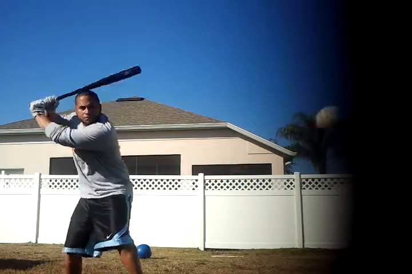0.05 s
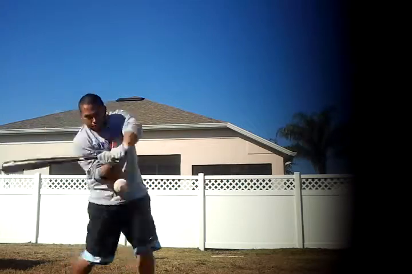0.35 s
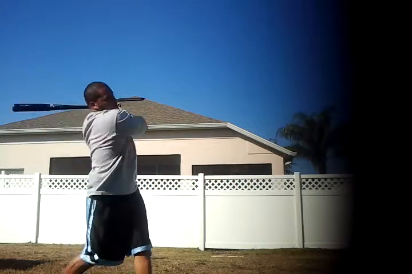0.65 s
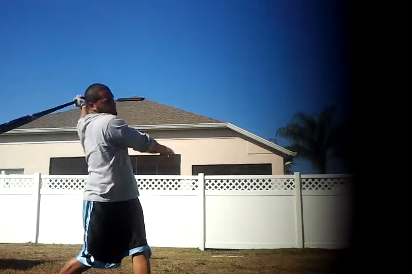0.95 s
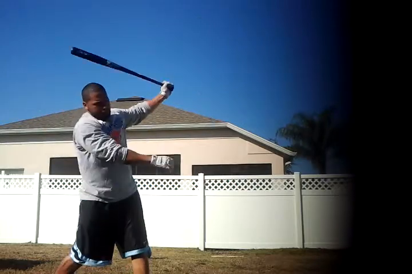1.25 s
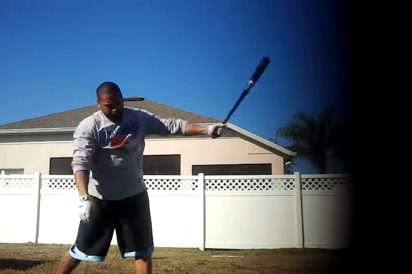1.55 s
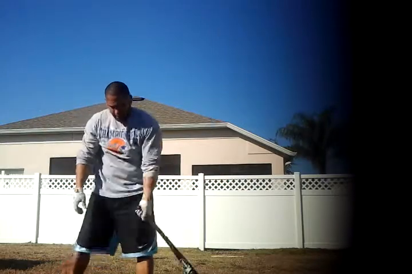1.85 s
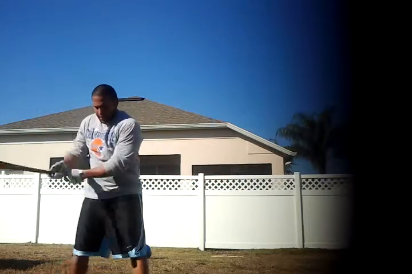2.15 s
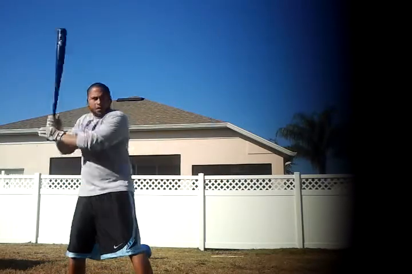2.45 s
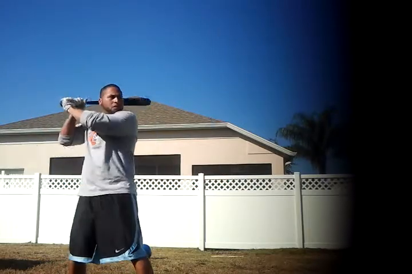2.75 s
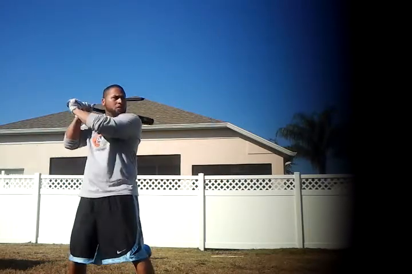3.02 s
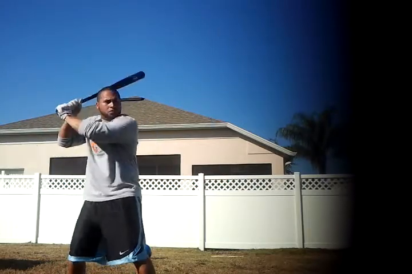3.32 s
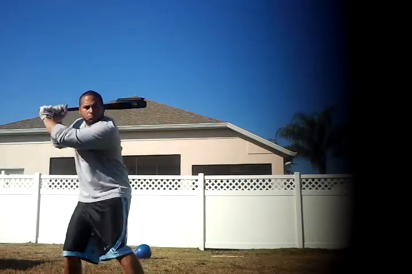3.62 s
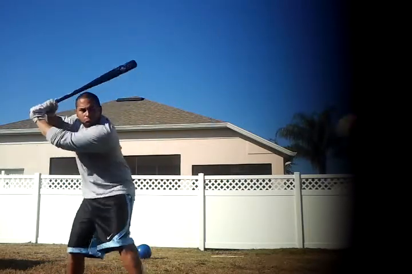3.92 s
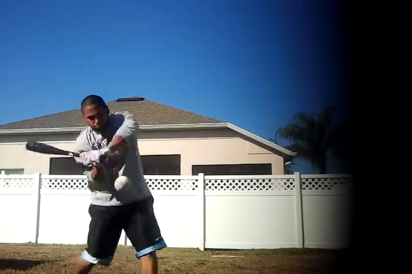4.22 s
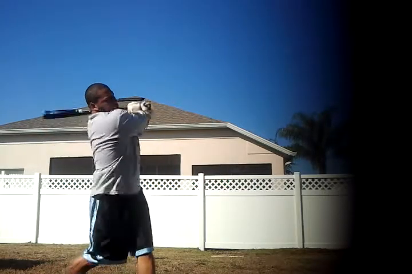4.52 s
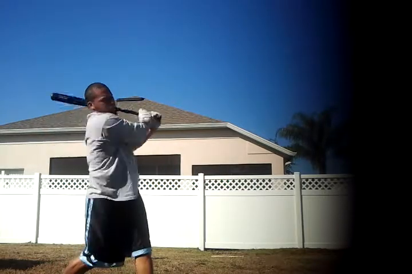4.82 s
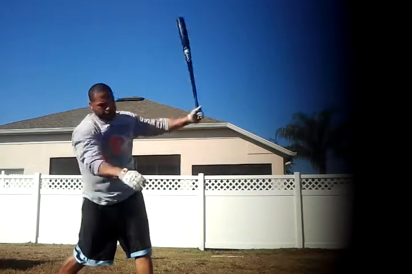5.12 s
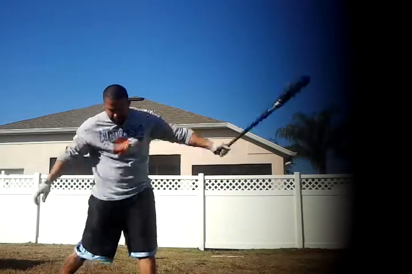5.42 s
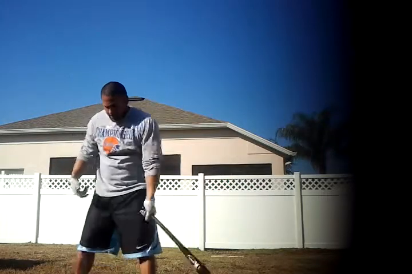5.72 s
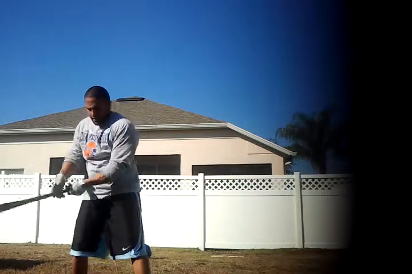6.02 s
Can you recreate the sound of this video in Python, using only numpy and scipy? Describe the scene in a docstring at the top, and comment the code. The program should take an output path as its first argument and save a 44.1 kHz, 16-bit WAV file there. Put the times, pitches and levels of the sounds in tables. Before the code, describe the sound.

A faint, steady outdoor hiss runs throughout, in a back yard. A few small, dry ticks come close by, then at about 0.5 seconds a bat swishes briefly and cracks hard against a ball, echoing quickly off the house and fence. At once the ball hits a practice net, which rattles while its steel frame clanks and jingles brightly. Between 1.1 and 1.6 seconds the ball drops and rustles through dry grass with soft knocks; faint clinks linger until about 2.6 seconds. More small ticks come from 3.8 seconds. At 4.4 seconds there is a second swish and crack, and the frame clatters and rings until about 5.2 seconds, with a tiny metal squeak. The ball lands in the grass with a dull knock around 5.1 seconds, and light clinks fade by 6 seconds. The loudest blows overload the small, narrow-band microphone.

```python
"""A swish and the hard crack of a bat, twice, thrown back by the house and fence of a back yard. Each ball
flies into a practice net whose steel frame clanks, jingles and rings on, then drops and rustles through dry
grass. Small ticks close by and a faint outdoor hiss fill the pauses. A small, narrow-band microphone picks it
up; the loudest blows are held down and their peaks clip flat."""
import sys
import numpy as np
from scipy import signal
from scipy.fft import rfft, irfft, next_fast_len
from scipy.io import wavfile
from scipy.ndimage import uniform_filter1d, minimum_filter1d

SR = 44100
rng = np.random.default_rng(int(sys.argv[2]) if len(sys.argv) > 2 else 0)


def wav_record(signal):
    """Record a signal, one row per channel, as 16-bit PCM in the file named by sys.argv[1]."""
    frames = np.transpose(np.atleast_2d(signal))
    bounded = np.clip(frames, -1, 1)
    # unit amplitude maps onto the largest positive 16-bit level
    quanta = np.round(bounded * 32767).astype(np.int16)
    wavfile.write(sys.argv[1], SR, quanta)


N = 276066
TIME = np.arange(N) / SR
MIC_ROLLOFF_HZ, MIC_CUTOFF_HZ = 6790, 8742

# The swings. Each row: moment of contact in seconds, crack level in dB, its t60 (time to fall 60 dB) in
# seconds, swish level in dB, then the net's rattle at the catch: level in dB, t60 in seconds.
SWINGS = [(0.549, 3.3, 0.058, -43, -13, 0.51), (4.4320, 3, 0.049, -41.5, -17, 0.45)]
# Tone of the crack. Each row: frequency in Hz, level in dB.
CRACK_SPECTRUM = [(60, -30), (150, -43.5), (300, -25), (500, -19), (760, 0), (1020, 0.5), (1500, 1.5),
                  (1900, -1), (2400, 3), (3300, -5.5), (5000, -6.5), (7000, -13.5), (8000, -48),
                  (9000, -55)]
# House and fence, heard from the microphone. Each row: echo delay in seconds, level in dB.
WALL_ECHOES = [(0.0315, -22), (0.0379, -6), (.051, -18), (.074, -13)]

def bat():
    """The barrel swishes up to the ball and cracks; house and fence answer."""
    cracks, swish_gain = np.zeros(N), np.zeros(N)
    for s, db, t60, swish_db, *_ in SWINGS:
        add(cracks, s, from_db(db) * colour(rng.standard_normal(SR), CRACK_SPECTRUM) * fade(t60))
        swish_gain += from_db(swish_db - 180 * np.abs(TIME - s)) * (TIME < s + .02)
    cracks = mic_band(cracks, low_hz=230)
    swish_spectrum = [(100, -15.5), (700, -1.5), (1800, -2.5), (7000, -9), (8500, -34.5)]
    out = cracks + swish_gain * colour(rng.standard_normal(N), swish_spectrum)
    thin = highpass(cracks, 900, order=1)   # light fence panels let the bass through
    for delay, db in WALL_ECHOES:
        add(out, delay, from_db(db) * thin)
    return out


# Blows on the net's steel frame. Each row: start in seconds, level in dB, centre of the clash in Hz,
# place from 0 (post) to 1 (rail), trim of the ring in dB.
FRAME_BLOWS = [(0.586, -4.5, 3600, 0.15, -23), (0.61, -0.5, 5760, 0.41, -5), (0.6505, 0.5, 6840, 0.7, -5),
               (0.684, -12.5, 5500, 0.38, 4), (0.7470, -10, 5100, 0, 3), (0.7878, -10, 5300, 0.99, -3),
               (0.9521, -23, 4830, 0.19, 1), (1.0633, -23, 5300, 0.67, 4.5), (1.2087, -25, 5180, 0.56, -6),
               (1.2820, -28.5, 4400, 0, -0.5), (1.593, -37.5, 4540, .9, 2), (1.793, -39, 2830, .75, 6),
               (2.063, -37, 3940, 0.79, 2), (2.614, -37, 4370, 0.45, 4.5), (4.4700, -3, 5070, 0.31, -24),
               (4.498, -9.5, 5500, .5, -13.5), (4.528, -15, 5500, 0.4, 7), (4.545, -5.5, 6140, 0.66, 0.5),
               (4.584, -16.5, 4900, 0.075, 9.5), (4.620, -6.5, 5300, 0, -3), (4.644, -9.5, 5900, 0.1, 5.5),
               (4.696, -16.5, 5460, 0.28, 3), (4.778, -8.5, 3900, 0.72, -5.5),
               (4.9438, -16.5, 6450, 1, 0.5), (5.064, -6.5, 5220, 1, -4), (5.089, -11.5, 5100, 0.91, -2),
               (5.1134, -19, 4300, 0.5, 7.5), (5.1748, -14.5, 4870, 1, 2), (5.349, -34, 4050, 0.8, 15.5),
               (5.647, -34.5, 4000, 0.6, 0), (6.068, -39.5, 3630, 1, 5.5)]
# The tubes' modes. Each row: pitch in Hz, level in dB struck at the post, level in dB struck at the rail,
# t60 in seconds before damping.
FRAME_MODES = [(1244, -17, -8, .25), (1470, -13, -13, .3), (2284, -12, -18, .2), (2440, -8, -14, .25),
               (3088, -17, -20, .9), (3165, -9, -17, .75), (3199, -11, -14, 1.), (3232, -9, -8, .65),
               (3322, -17, -11, .7), (3513, -14, 1, .42), (3865, -9, -14, .3), (3905, -14, -6, .22),
               (4140, -14, -12, .25), (4302, -7, -18, .3), (4347, -8, -17, .35), (4743, -7, 0, .28),
               (4855, -8, -10, .22), (4899, -12, 0, .25), (5310, -12, -3, .18), (5470, 1, -12, .24),
               (5500, -3, -14, .2), (5590, -2, -8, .2), (6080, -9, -6, .16), (6260, -2, -7, .17),
               (6540, -6, -8, .14), (6681, -13, -6, .15), (7149, -17, -8, .12)]
DAMP_FROM_HZ = 2900   # the netting shortens the ring above this pitch

def frame():
    """Each blow is a snap, a brief clash and two rebounds; where it lands decides which modes ring on."""
    ringing, clashes = np.zeros(N), np.zeros(N)
    hz, post_db, rail_db, t60 = np.transpose(FRAME_MODES)
    t60 = t60 * np.minimum(DAMP_FROM_HZ / hz, 1) ** .83
    ping = from_db(1) * fade(.14)   # all modes start loud, until the loose joints soak it up
    modes = np.array([np.sin(2 * np.pi * f * TIME[:SR]) * (fade(t) + ping) for f, t in zip(hz, t60)])
    for s, db, centre_hz, place, ring_db in FRAME_BLOWS:
        place_db = (1.5 - place) * post_db + place * rail_db
        focus_db = 3 - 2.5 * np.abs(np.log2(hz / centre_hz))   # modes near the clash ring best
        soft_db = .23 * db * np.maximum(np.log2(hz / DAMP_FROM_HZ), 0)   # softer blows ring duller
        strengths = from_db(place_db + focus_db + soft_db + rng.normal(0, 1, len(hz)))
        ring = (strengths * rng.choice([-1, 1], len(hz))) @ modes
        detune = 1 + .0015 * rng.normal()   # the joints shift from blow to blow
        ring = np.interp(TIME[:SR] * detune, TIME[:SR], ring)
        add(ringing, s, from_db(db + ring_db - 14) * ring)
        add(clashes, s, from_db(db - 8) * burst(centre_hz, octaves=.84, t60=.1, low_hz=700, size=8192))
        snap = burst(centre_hz, octaves=1, t60=.02, low_hz=900, size=2048)
        for touch in range(3):   # the loose joints chatter, 7 dB weaker each time
            delay = touch * .014 * rng.uniform(.61, 1.3)
            add(clashes, s + delay, from_db(db - 4.5 - 7 * touch) * snap)
    return clashes + mic_band(ringing, low_hz=840)


def shaken_modes(contacts, modes, t60_scale):
    """Small contacts all over the frame ring its modes; rms 1."""
    out = np.zeros(N)
    for hz, post_db, rail_db, t60 in modes:
        radius, angle = from_db(-60 / (t60_scale * t60 * SR)), 2 * np.pi * hz / SR
        feedback = [1, -2 * radius * np.cos(angle), radius ** 2]
        ring = signal.lfilter([np.sin(angle)], feedback, contacts + 1e-18)
        out += from_db((post_db + rail_db) / 2) * ring
    return rms_one(out)


# Tone of the rattling net. Each row: frequency in Hz, level in dB.
RATTLE_SPECTRUM = [(88, -62.5), (150, -47), (481, -4.5), (540, -13), (1470, 5), (2410, 7), (5100, -4),
                   (5460, -1.5), (5930, -14.5), (6440, -5.5), (7480, -8.5), (8000, -47.5), (10400, -59),
                   (17600, -120)]
# The ball drops down the net and bounces in the grass below. Each row: start in seconds,
# grass level in dB, net level in dB, hold in seconds, t60 in seconds.
BALL_LANDINGS = [(1.128, -43, -46, .015, 0.36), (1.201, -33.5, -37, 0.021, 0.47),
                 (1.313, -35.5, -40, 0.015, 0.37), (5.107, -31, -33.5, 0.12, 0.047),
                 (5.427, -52.5, -51.5, 0.035, 0.54)]
FLIGHT_S, LANDING_ATTACK_S = .036, .023   # the net stands a short flight from the bat

def net():
    """Catches, blows and landings rattle the net and set the frame jangling; then it sways on faintly."""
    sway = sum(swell(s + FLIGHT_S, db=-43, t60=3.7, attack_s=.21) for s, *_ in SWINGS)
    shake = sum(swell(s + FLIGHT_S, db, t60) for s, *_, db, t60 in SWINGS)
    shake += sum(swell(s, db, t60, LANDING_ATTACK_S, hold) for s, _, db, hold, t60 in BALL_LANDINGS)
    for s, db, *_ in FRAME_BLOWS:
        add(shake, s, from_db(db - 17.5) * fade(.075))
    contacts = grains(per_s=330, spread_db=2)
    jangle = shaken_modes(contacts, FRAME_MODES, t60_scale=1)
    long_modes = [mode for mode in FRAME_MODES if mode[-1] > .4]
    singing = shaken_modes(contacts, long_modes, t60_scale=.13) * flutter(depth_db=.5, size=3000)
    rattle = from_db(1) * colour(grains(per_s=2200, spread_db=4), RATTLE_SPECTRUM)
    shaking = (rattle + from_db(-8) * jangle) * flutter(depth_db=3.5, size=400) * shake
    swaying = (singing + rattle) * sway
    return highpass(shaking + swaying, 380, order=3)


# Dry grass under the net. Each row: frequency in Hz, level in dB.
GRASS_SPECTRUM = [(47, -59), (80, -23.5), (907, 7.5), (1620, -4.5), (2990, 0), (3230, -29), (3920, 0.5),
                  (4320, 4.5), (6470, -0.5), (8000, -47), (10400, -77), (17600, -120)]
# Soft knocks near the ground. Each row: start in seconds, level in dB, centre in Hz, t60 in seconds.
GROUND_KNOCKS = [(1.118, -44, 260, 0.096), (1.533, -29.5, 674, 0.029), (1.5608, -28.5, 860, 0.011),
                 (4.924, -39.5, 700, 0.061), (5.142, -22, 926, 0.06)]

def ground():
    """The ball crackles through dry grass at each landing, among a few dull knocks."""
    pressure = sum(swell(s, db, t60, LANDING_ATTACK_S, hold) for s, db, _, hold, t60 in BALL_LANDINGS)
    crackle = colour(grains(per_s=1100, spread_db=4), GRASS_SPECTRUM) * pressure
    out = highpass(crackle, 160, order=2)   # the blades radiate little bass
    for s, db, hz, t60 in GROUND_KNOCKS:
        add(out, s, from_db(db) * burst(hz, octaves=1, t60=t60, low_hz=.48 * hz))
    return out


# Fittings rubbing on the frame. Each row: loudest moment in seconds, level in dB, pitch in Hz,
# glide in octaves per second, half length in seconds.
FITTING_SLIPS = [(1.286, -30, 4290, 1, .005), (4.728, -21, 2444, -3, .007), (5.046, -37, 4400, -2, .006),
                 (5.448, -48, 2050, -12, .008)]

def squeaks():
    """A fitting slips on the tube and sings for an instant."""
    out, t = np.zeros(N), TIME[:SR // 5] - .1
    for s, db, hz, glide, half_s in FITTING_SLIPS:
        pitch = hz * 2 ** (glide * t) * (1 + .011 * wander(len(t), size=80))
        envelope = from_db(db) * np.exp(-(t / half_s) ** 2 / 2)
        add(out, s + t[0], envelope * np.sin(2 * np.pi * np.cumsum(pitch) / SR))
    return out


# Ticks near the microphone. Each row: start in seconds, level in dB, centre in Hz.
CLOSE_TICKS = [(0.344, -36.5, 2300), (0.365, -33.5, 2030), (0.381, -33, 2260), (0.396, -32.5, 2220),
               (1.678, -29.5, 3950), (2.368, -42, 3970), (3.81, -42, 2500), (3.974, -37, 4800),
               (4.009, -32, 2190), (4.258, -34, 2300), (4.271, -32, 2590), (4.378, -33.5, 4800),
               (5.029, -36, 4500)]

def ticks():
    """Small dry ticks close by, each a very short puff of noise."""
    out = np.zeros(N)
    for s, db, hz in CLOSE_TICKS:
        add(out, s, from_db(db - 1.5) * burst(hz, octaves=.9, t60=.011, low_hz=1010))
    return out


# Tone of the echoes from all round the yard. Each row: frequency in Hz, level in dB.
YARD_SPECTRUM = [(100, -17), (400, 0), (1500, -1.5), (3000, 2.5), (7000, -3)]

def yard(sound):
    """Scattered echoes from fence, roofs and trees build up and die away."""
    build_up = np.clip((TIME[:SR] - .015) / .015, 0, 1)
    tail = colour(rng.standard_normal(SR), YARD_SPECTRUM) * fade(.68) * build_up
    return from_db(-16) * signal.fftconvolve(sound, tail / np.linalg.norm(tail))[:N]


# The open air at the microphone. Each row: frequency in Hz, level in dB.
AIR_SPECTRUM = [(18, -68), (30, -33), (60, -20), (203, -15.5), (234, -9.5), (319, -15), (465, -6.5),
                (663, -4.5), (711, -2.5), (1200, -1.5), (3010, -6), (3630, -6.5), (5690, -7.5),
                (7040, -15.5), (8500, -42.5), (11000, -69), (18700, -120)]

def air():
    """A faint, steady outdoor hiss behind everything."""
    return from_db(-53) * colour(rng.standard_normal(N), AIR_SPECTRUM)


def from_db(db):
    """Decibels to gain."""
    return 10 ** (np.asarray(db) / 20)


def rms_one(x):
    """Scale to rms 1."""
    return x / np.sqrt(np.mean(x ** 2) + 1e-20)


def add(track, s, sound):
    """Mix a sound in at s seconds."""
    at = int(round(s * SR))
    track[at:at + len(sound)] += sound[:N - at]


def fade(t60, size=SR):
    """Exponential decay from 1, down 60 dB after t60 seconds."""
    return 10 ** (-3 * TIME[:size] / t60)


def swell(s, db, t60, attack_s=.003, hold_s=0):
    """Gain over time: attack from s seconds, hold, exponential release."""
    t = TIME - s
    return from_db(db - 60 * np.maximum(t - attack_s - hold_s, 0) / t60) * np.clip(t / attack_s, 0, 1)


def highpass(x, hz, order):
    """Roll off the bass below hz."""
    return signal.sosfilt(signal.butter(order, hz, "high", fs=SR, output="sos"), x)


def mic_band(x, low_hz):
    """Steep cuts below low_hz and at the top of the microphone's range."""
    lowpass = signal.butter(14, MIC_ROLLOFF_HZ, fs=SR, output="sos")
    return signal.sosfilt(lowpass, highpass(x + 1e-18, low_hz, order=3))


def colour(x, spectrum):
    """Shape a signal by a spectrum of (Hz, dB) points; rms 1."""
    hz, db = np.transpose(spectrum)
    size = next_fast_len(len(x))
    bins = np.maximum(np.fft.rfftfreq(size, 1 / SR), 1)
    gain = from_db(np.interp(np.log(bins), np.log(hz), db))
    return rms_one(irfft(rfft(x, size) * gain, size)[:len(x)])


def burst(hz, octaves, t60, low_hz, size=16384):
    """A dying puff of noise around a centre pitch; a small body radiates little below low_hz."""
    bins = np.maximum(np.fft.rfftfreq(size, 1 / SR), 1)
    hump = (bins < MIC_CUTOFF_HZ) / (1 + (np.log2(bins / hz) / octaves) ** 2)
    noise = rms_one(irfft(hump * np.exp(2j * np.pi * rng.random(len(bins)))))
    return mic_band(noise * fade(t60, size), low_hz)


def grains(per_s, spread_db):
    """Random tiny contacts of uneven size; rms 1."""
    sizes = from_db(spread_db * np.minimum(rng.exponential(1, N), 3.5)) * rng.choice([-1, 1], N)
    return rms_one(sizes * (rng.random(N) < per_s / SR))


def wander(length, size):
    """Noise smoothed over size samples; rms 1."""
    return rms_one(uniform_filter1d(rng.standard_normal(length), size=size))


def flutter(depth_db, size):
    """A random gain that wanders over about size samples; rms 1."""
    return rms_one(from_db(depth_db * wander(N, size)))


def scene():
    """One microphone in the yard: the practice and its echoes, close ticks and the open air."""
    practice = bat() + frame() + net() + squeaks() + ground()
    hiss = air()
    return (practice + yard(practice) + ticks() + hiss)[None]


def record(dry):
    """A very fast limiter holds the peaks, the band is narrowed, overshoots clip and the top is cut."""
    threshold, ceiling, top_hz = .73, .71, 15900
    gain = threshold / np.maximum(np.abs(dry), threshold)
    gain = uniform_filter1d(minimum_filter1d(gain, size=71), size=71)
    narrow = signal.sosfilt(signal.ellip(10, .1, 70, MIC_CUTOFF_HZ, fs=SR, output="sos"), dry * gain)
    clipped = np.clip(narrow, -ceiling, ceiling)
    return signal.sosfilt(signal.ellip(10, .1, 70, top_hz, fs=SR, output="sos"), clipped)


dry = scene()
out = record(dry)
wav_record(out)
```